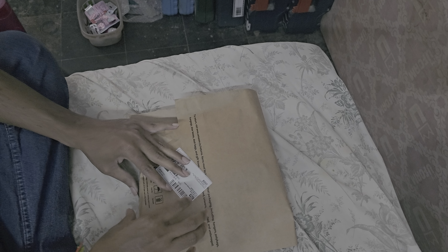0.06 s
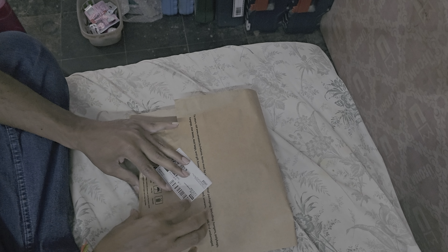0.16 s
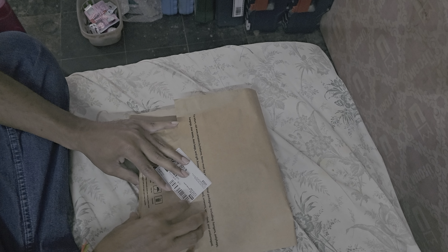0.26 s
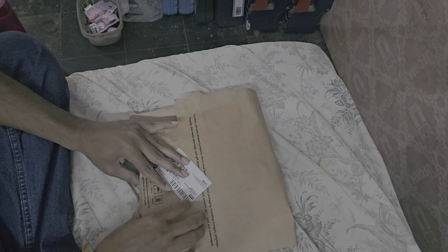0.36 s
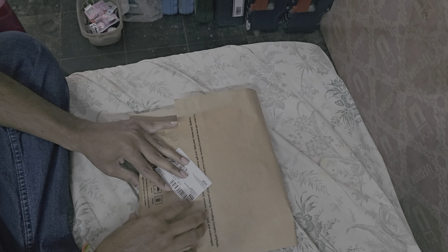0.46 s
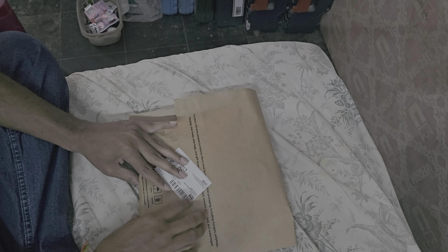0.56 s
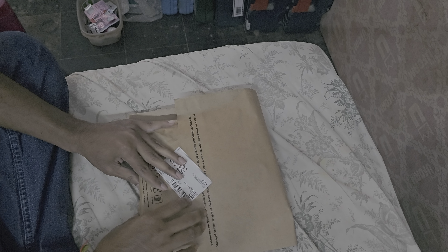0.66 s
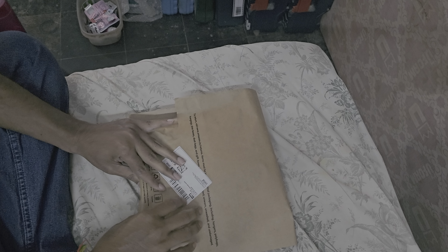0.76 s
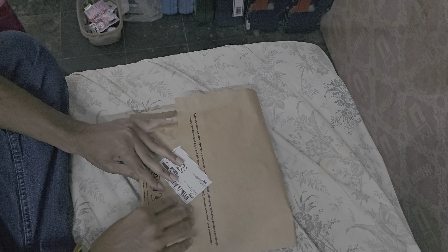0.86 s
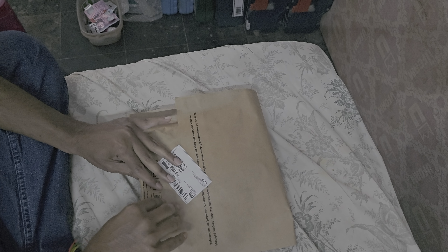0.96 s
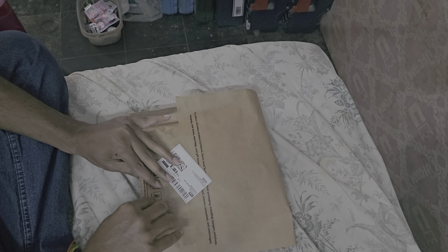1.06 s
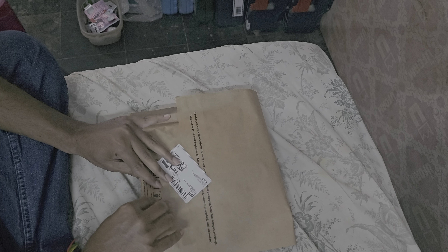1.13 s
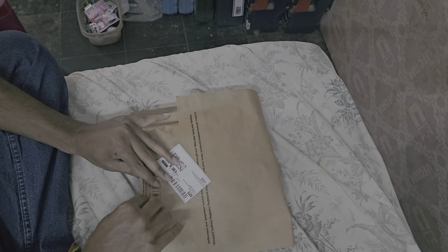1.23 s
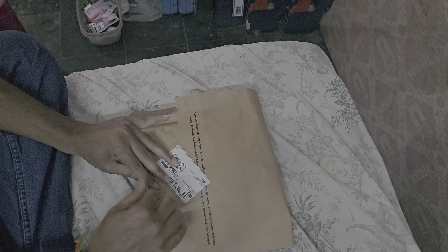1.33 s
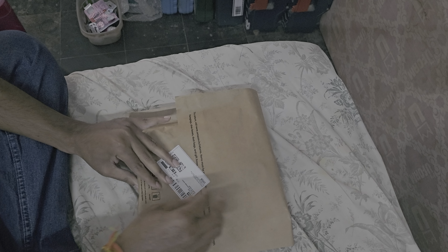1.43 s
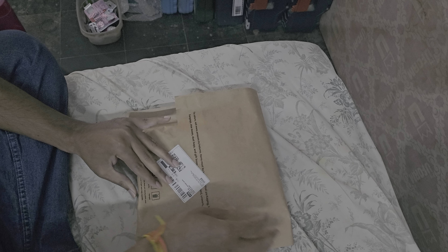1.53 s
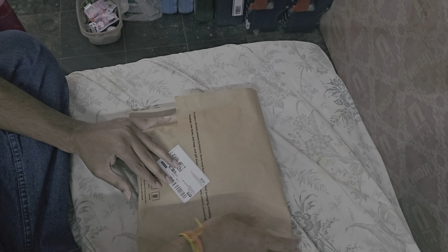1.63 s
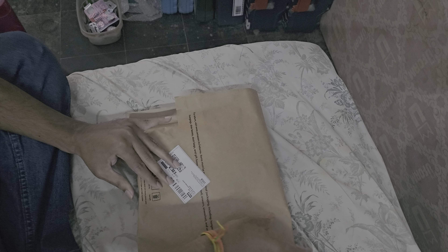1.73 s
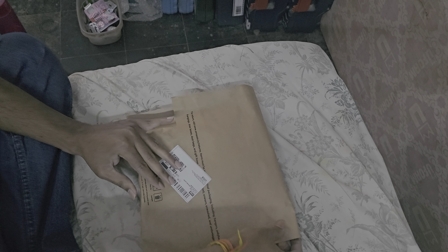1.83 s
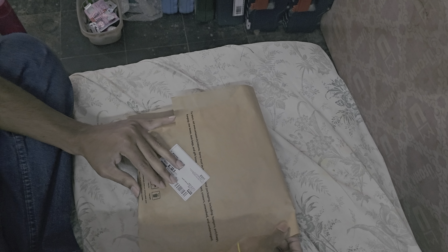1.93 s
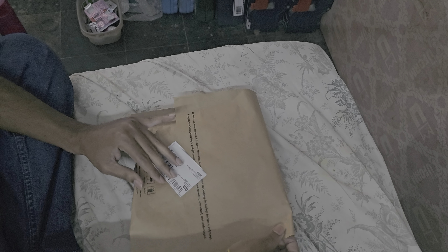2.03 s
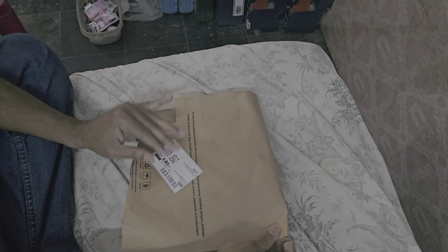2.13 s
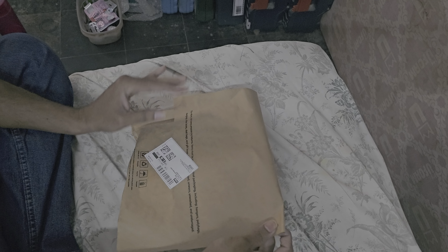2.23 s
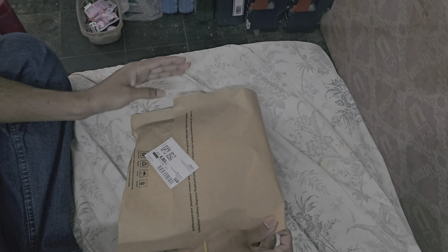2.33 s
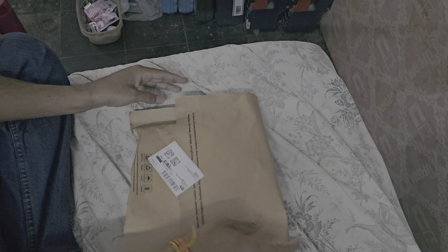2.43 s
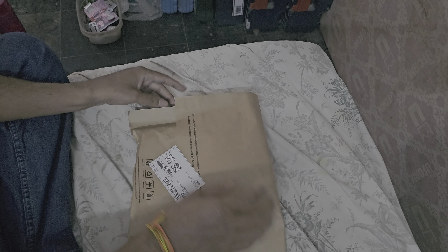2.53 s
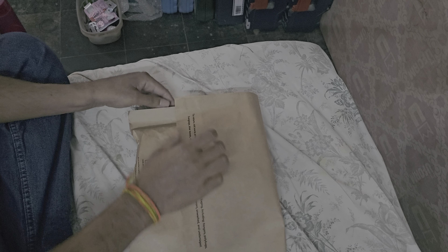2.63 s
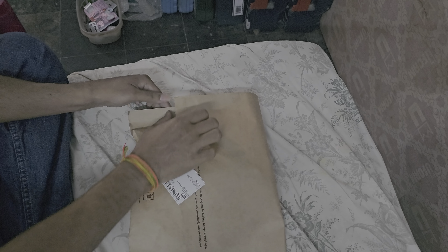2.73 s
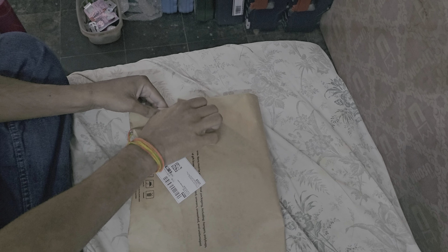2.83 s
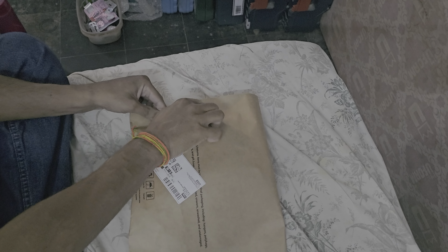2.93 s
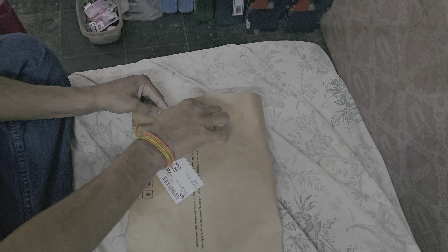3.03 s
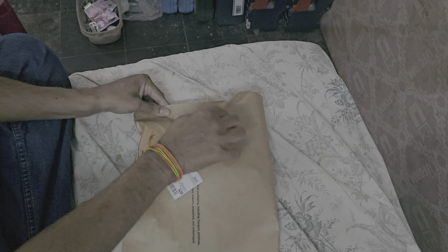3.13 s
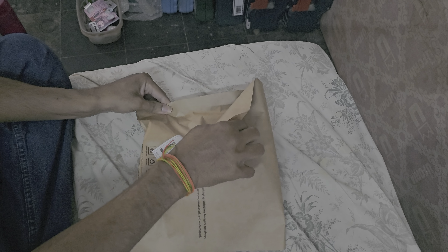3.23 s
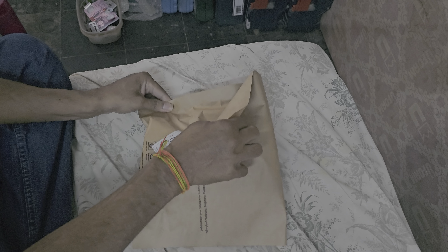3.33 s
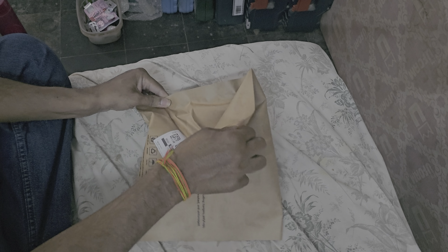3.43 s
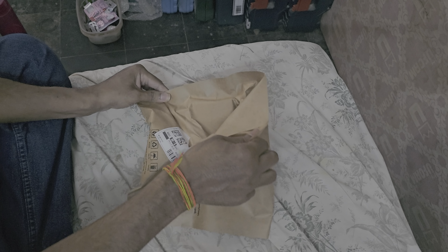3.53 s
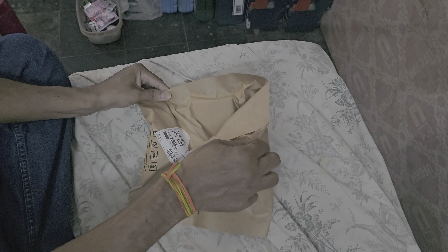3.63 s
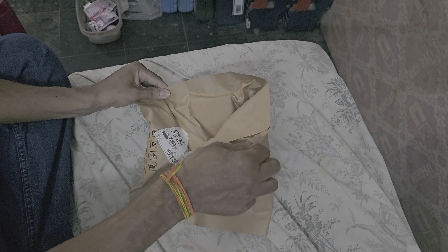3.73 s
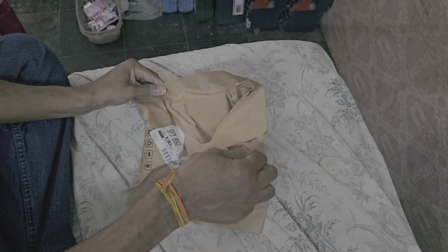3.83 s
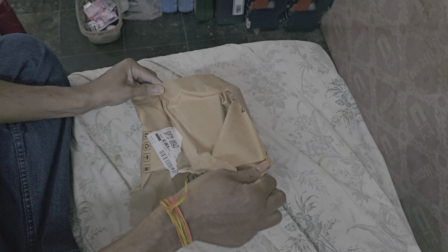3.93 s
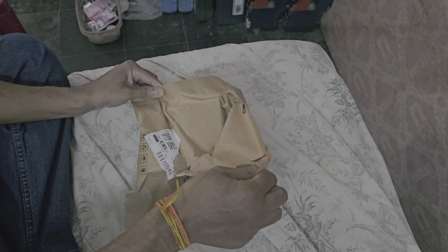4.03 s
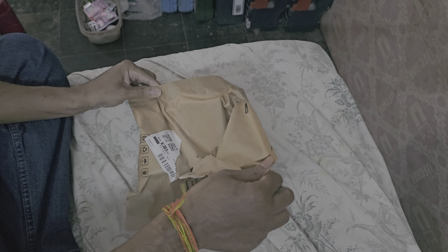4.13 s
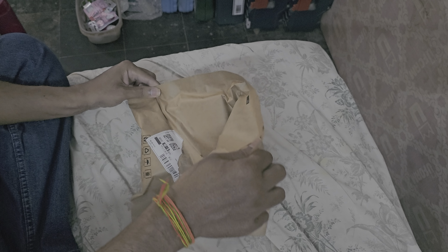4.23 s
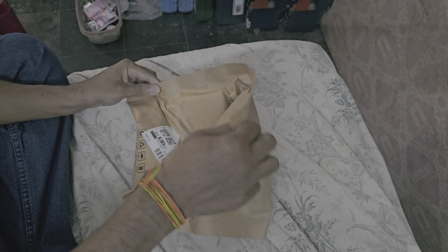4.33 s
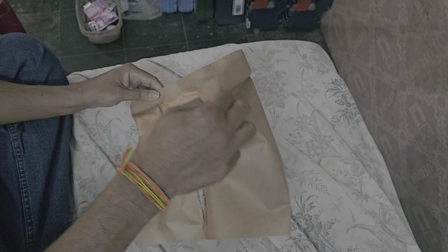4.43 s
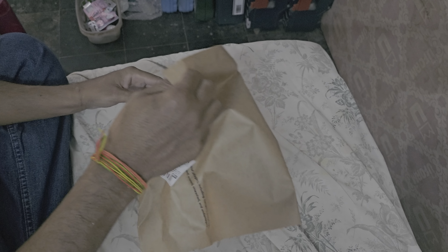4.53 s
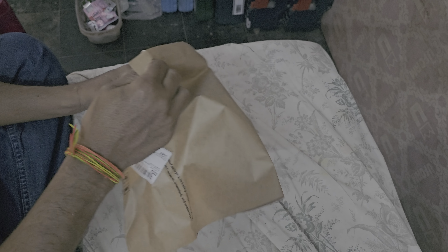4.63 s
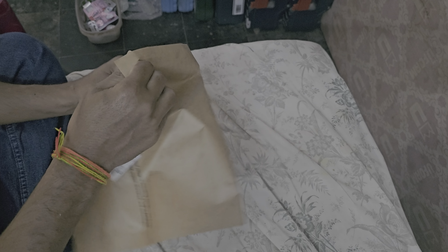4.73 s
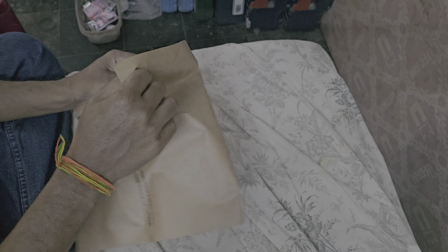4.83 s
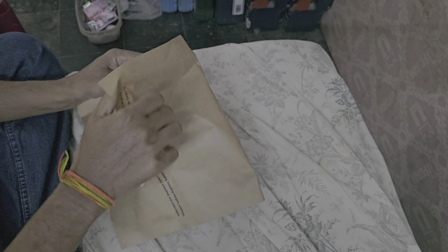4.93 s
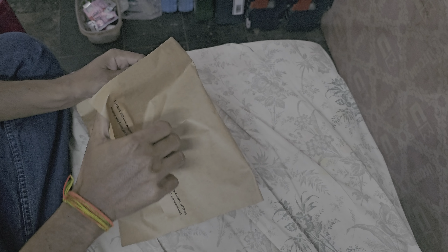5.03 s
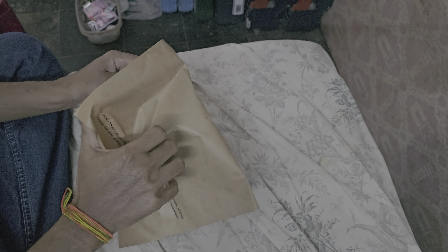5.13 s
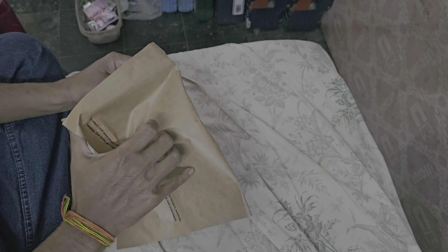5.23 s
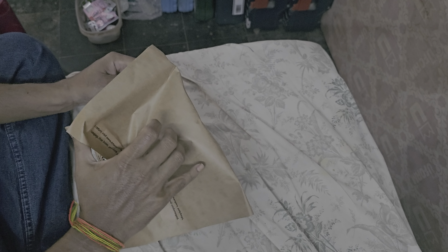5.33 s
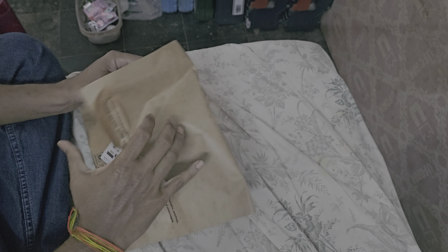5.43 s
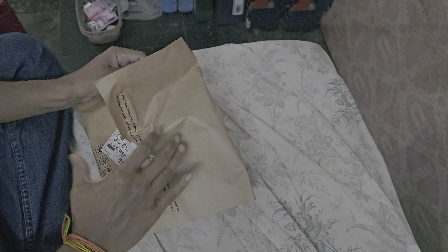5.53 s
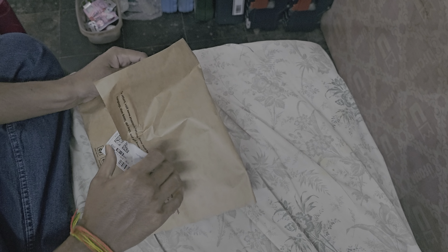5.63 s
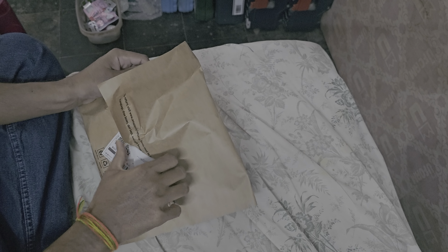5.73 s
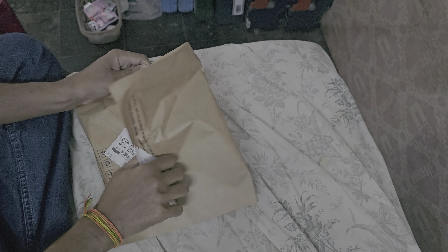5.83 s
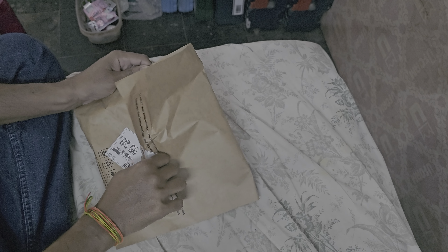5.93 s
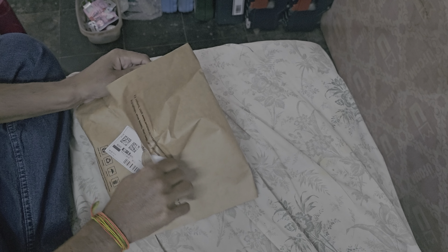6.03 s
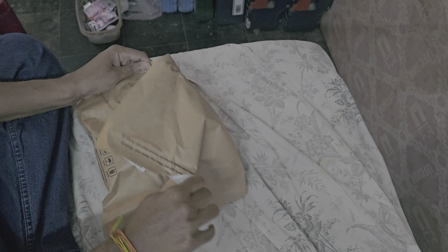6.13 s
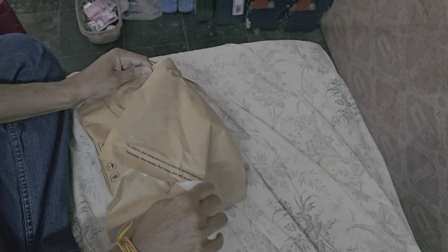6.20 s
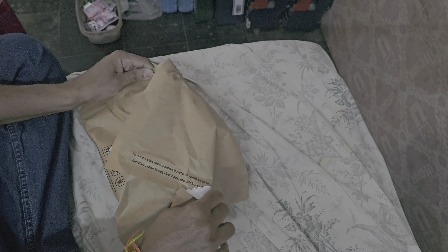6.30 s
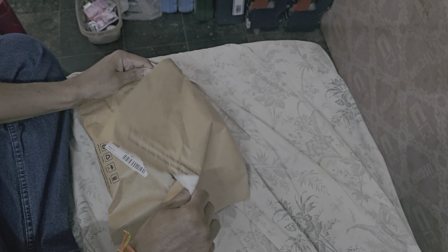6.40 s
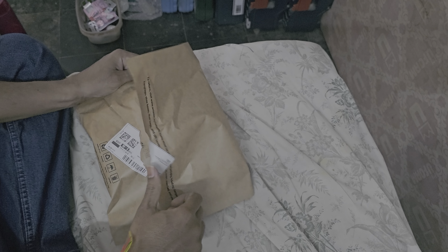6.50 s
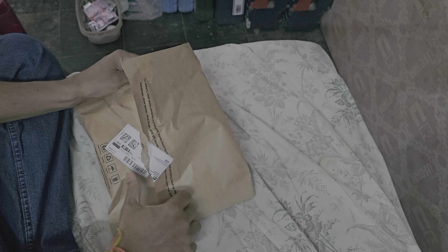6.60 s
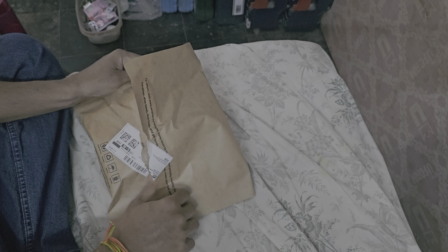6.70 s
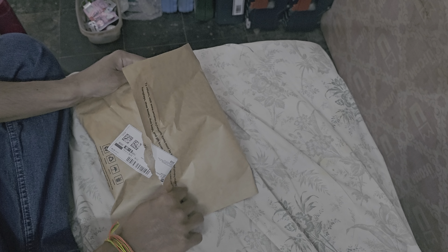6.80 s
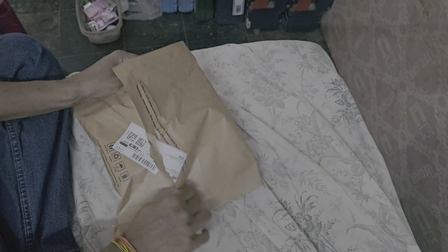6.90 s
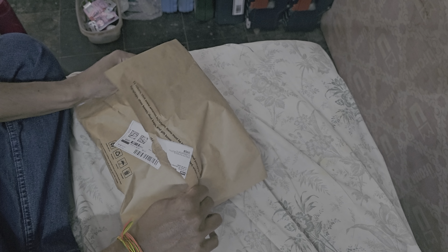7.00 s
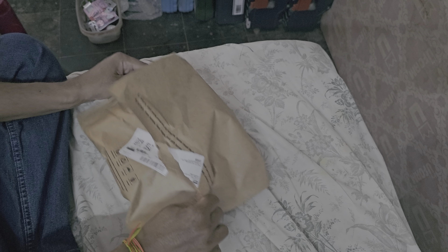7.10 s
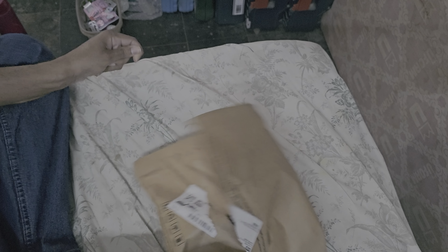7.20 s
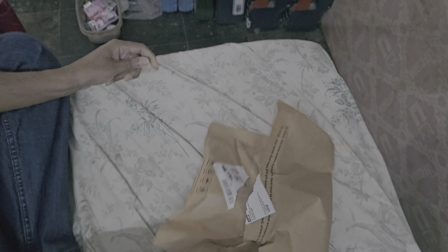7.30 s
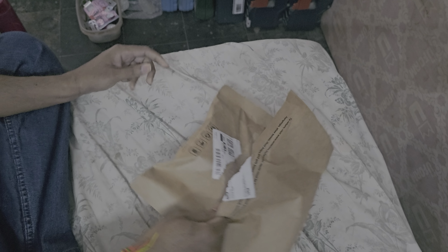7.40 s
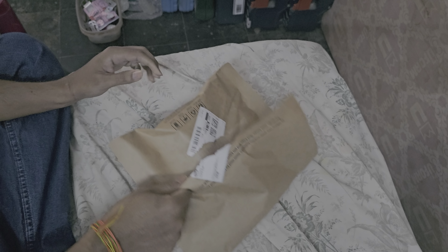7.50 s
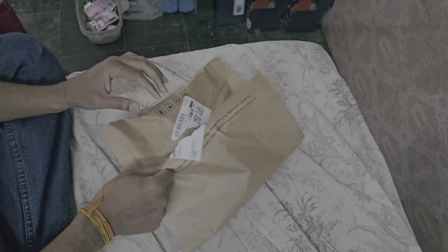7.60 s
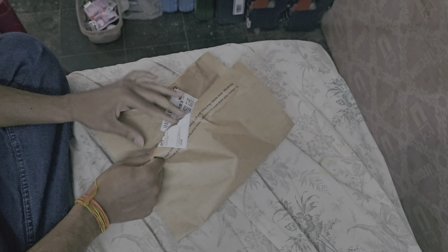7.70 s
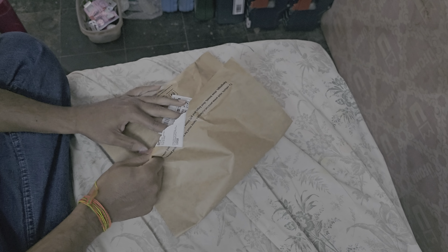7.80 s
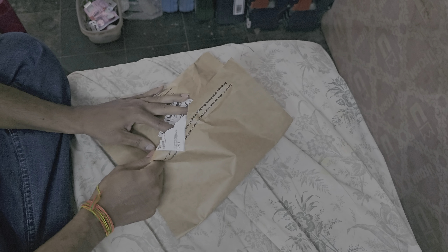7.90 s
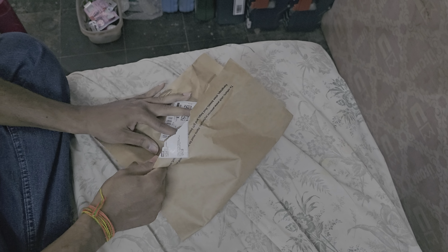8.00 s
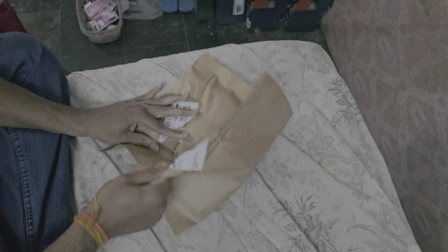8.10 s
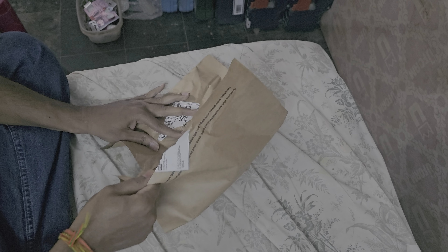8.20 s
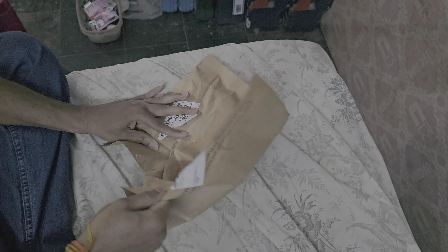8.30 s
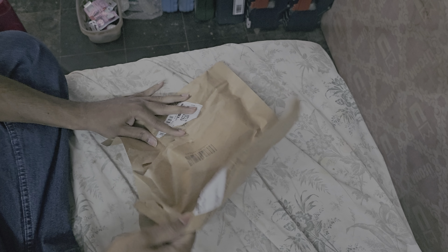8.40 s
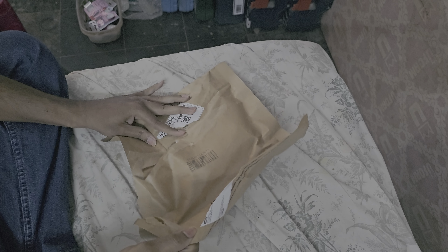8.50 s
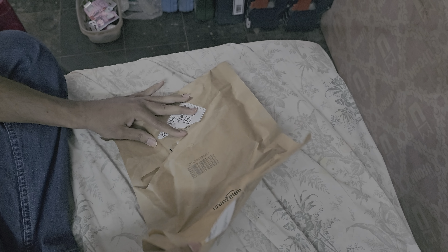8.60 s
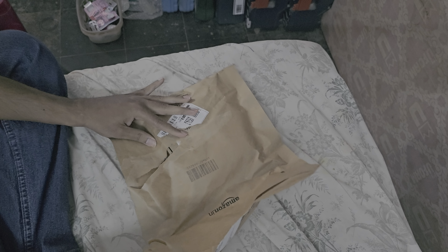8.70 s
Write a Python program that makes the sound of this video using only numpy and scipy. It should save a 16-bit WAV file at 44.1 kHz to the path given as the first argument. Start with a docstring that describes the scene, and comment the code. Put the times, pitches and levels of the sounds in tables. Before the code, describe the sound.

Hands rub, crease and tear a stiff paper envelope, faint at first, then loud irregular snaps and crackles over a low room hum.

```python
"""Small room, bed, phone with two microphone ports close above a stiff paper envelope; low hum throughout.
Faint creases and rubs come first, with a firmer snap near 1 s; from 2.7 s the hands pull harder.
The loudest snap falls at 3.1 s, tearing follows to 4 s, then lighter pulls, and heavy ones again from 5.2 s to 8.5 s.
Creases are short filtered cracks with a thud; crackle, hiss and flapping are paper noise gated by random
buckles and raised by strokes of the hands. The room answers with a short tail of decaying noise."""
import sys
import numpy as np
from scipy import signal
from scipy.fft import rfft, irfft
from scipy.io import wavfile
from scipy.ndimage import uniform_filter1d

SR = 44100
rng = np.random.default_rng(int(sys.argv[2]) if len(sys.argv) > 2 else 0)


def master(y):
    """Save y as 16-bit WAV."""
    cut = np.clip(np.atleast_2d(y).T, -1, 1)
    pcm = np.round(cut * 32767)  # scale
    wavfile.write(sys.argv[1], SR, pcm.astype(np.int16))


N = 385875  # 8.75 s

# building and street rumble, relative spectrum: (frequency [Hz], density [dB per Hz])
HUM_SPECTRUM = [(12, -34), (20, -10), (81, 2.5), (142, -7.5), (377, -12), (434, -15.5), (574, -14.5),
                (1480, -29), (1710, -31), (3340, -34.5), (5080, -48), (7310, -47.5), (8180, -54),
                (16000, -72)]
# the two microphone ports: (frequency [Hz], side against mid [dB])
PORT_DIFFERENCE = [(30, -16), (100, -21.5), (300, -12.5), (1000, -5.5), (3000, 0)]
# reverberation of the small room: (frequency [Hz], time to fall 60 dB [s])
ROOM_DECAY = [(300, 0.32), (8000, 0.32)]
# relative spectrum of the paper noise: (frequency [Hz], density [dB per Hz])
PAPER_SPECTRUM = [(59, -31), (100, -10.5), (262, -2.5), (317, -6.5), (1240, -2), (2210, -2.5), (4290, 2),
                  (8510, -9.5), (15100, -13.5), (16500, -11)]
# pulls, tears and rubs of the hands: (start [s], swell [s], hold [s], crackle [dB],
# fibre hiss against crackle [dB], flapping sheet against crackle [dB])
HAND_STROKES = [(0.45, 0.041, 0.035, -57.5, -5, -6), (0.69, 0.065, 0.023, -52, -14, 0),
                (0.84, 0.07, 0.055, -47, -9, 0.5), (1.0, 0.01, 0.14, -53, -5.5, -1),
                (1.2, 0.048, 0.03, -47, -6, -7), (1.29, 0.019, 0.026, -47, -4, 0.5),
                (1.81, 0.028, 0.075, -53.5, -2, -1), (1.98, 0.017, 0.017, -42, -6, -10),
                (2.19, 0.015, 0.12, -55, -0.5, 3.5), (2.41, 0.031, 0.11, -55, -0.5, -0.5),
                (2.721, 0.028, 0.012, -38, -13, -3), (2.79, 0.11, 0.062, -38.5, -12, -7),
                (2.98, 0.01, 0.14, -47, -10, -10), (3.103, 0.0057, 0.25, -28, -1, -7.5),
                (3.459, 0.011, 0.13, -24.5, -2.5, -5.5), (3.62, 0.021, 0.043, -32, 0, -3.5),
                (3.819, 0.044, 0.089, -30.5, -1.5, -10), (3.947, 0.0046, 0.088, -24.5, 2, -10.5),
                (4.239, 0.016, 0.056, -40, -17, -9), (4.38, 0.032, 0.032, -37.5, -11, -4.5),
                (4.48, 0.0088, 0.06, -38, -16, -4), (4.717, 0.01, 0.078, -30, -16, -9.5),
                (4.91, 0.027, 0.12, -32.5, -9, -9), (5.0, 0.01, 0.13, -38.5, -11.5, -7),
                (5.201, 0.05, 0.018, -36, -2, -0.5), (5.487, 0.0026, 0.036, -29, -7.5, 1),
                (5.56, 0.033, 0.015, -48, -12, 6.5), (5.833, 0.013, 0.014, -34, -10.5, 1),
                (5.87, 0.051, 0.067, -30.5, -11.5, -9.5), (6.0, 0.01, 0.075, -33.5, -32, -10),
                (6.065, 0.012, 0.06, -26.5, -3, -9), (6.07, 0.087, 0.066, -20, -4, -7.5),
                (6.251, 0.013, 0.03, -27, -5, -11.5), (6.438, 0.035, 0.073, -32.5, -11.5, -3.5),
                (6.56, 0.011, 0.028, -29, -22, -7), (6.72, 0.098, 0.07, -44, -2, -6),
                (6.922, 0.074, 0.028, -27, -3.5, -4), (7.059, 0.032, 0.075, -31.5, -2.5, -12),
                (7.185, 0.011, 0.12, -26, -10.5, -7), (7.28, 0.024, 0.056, -24.5, -6, -3),
                (7.4, 0.005, 0.13, -44, 1, -14), (7.53, 0.011, 0.037, -45, -2, -7.5),
                (7.64, 0.0069, 0.062, -44, -8, 0), (7.72, 0.0055, 0.063, -37, -10.5, -3.5),
                (7.818, 0.0035, 0.012, -27.5, -5.5, -3), (7.869, 0.043, 0.048, -30.5, -5.5, -4),
                (8.0, 0.011, 0.1, -38, -4.5, -4), (8.099, 0.006, 0.1, -22.5, -1, -7),
                (8.345, 0.051, 0.053, -23, 1, -7.5), (8.599, 0.052, 0.019, -40, -12, -3.5),
                (8.69, 0.0069, 0.068, -43, -9, -10)]
# creases that snap: (time [s], peak [dB], ring [Hz], treble rms over SNAP_S against the peak [dB])
CREASE_SNAPS = [(0.222, -45, 600, -32), (0.335, -48, 826, -31), (0.452, -48, 2470, -25),
                (0.765, -40, 3000, -24), (0.785, -21, 2720, -20), (0.79, -20, 1280, -28),
                (0.917, -40, 3000, -26), (0.934, -33, 700, -25), (0.97, -12.5, 1020, -19.5),
                (1.163, -42, 2490, -27), (1.204, -31.5, 2600, -32), (1.317, -29, 1210, -21),
                (1.495, -24.5, 2480, -25), (1.884, -37.5, 624, -15), (1.992, -31, 2180, -14),
                (2.008, -35, 3500, -10), (2.277, -36, 1500, -25), (2.423, -37, 2500, -24),
                (2.564, -29.5, 1520, -9), (2.759, -21.5, 1840, -16.5), (2.85, -24, 2770, -16.5),
                (2.919, -19.5, 1430, -14), (2.935, -15, 1320, -21.5), (3.054, -31.5, 760, -14),
                (3.108, -3.5, 1520, -16.5), (3.14, -15, 1830, -21), (3.32, -9, 3180, -20),
                (3.408, -12.5, 624, -24.5), (3.468, -12.5, 1350, -15), (3.511, -10, 1190, -15),
                (3.568, -12.5, 890, -17), (3.664, -10, 1930, -14), (3.8, -25.5, 1390, -17),
                (3.953, -12, 1440, -6), (3.969, -9, 4180, -4.5), (3.99, -8.5, 1500, -16),
                (4.265, -23.5, 1082, -15), (4.324, -20, 840, -15), (4.48, -28, 1700, -30),
                (4.522, -18.5, 1400, -13.5), (4.607, -16.5, 2950, -9), (4.722, -16.5, 880, -23),
                (4.739, -24, 1500, -15.5), (4.792, -19, 3530, -13), (4.813, -22, 800, -25),
                (4.827, -8.5, 1280, -15), (4.921, -19, 4200, -36), (4.934, -19, 826, -25),
                (4.958, -17, 3000, -23), (4.982, -17.5, 1390, -13.5), (5.086, -22, 4270, -8),
                (5.113, -21, 1450, -17), (5.211, -21.5, 1170, -23), (5.243, -10.5, 3650, -13.5),
                (5.276, -19.5, 1110, -13), (5.356, -13.5, 1390, -11), (5.451, -20.5, 1400, -11),
                (5.491, -10, 1090, -19.5), (5.592, -23, 1090, -17), (5.609, -12.5, 1270, -12.5),
                (5.706, -35, 2700, -17), (5.84, -24.5, 950, -28), (5.933, -14.5, 1410, -15.5),
                (5.964, -15, 597, -20), (6.025, -19.5, 2000, -35), (6.069, -15.5, 1340, -19),
                (6.263, -9.5, 1540, -40), (6.338, -12, 980, -15), (6.47, -23.5, 1430, -15),
                (6.523, -11.5, 1520, -14), (6.579, -20, 870, -18.5), (6.729, -25, 1990, -18.5),
                (6.777, -18.5, 1500, -14), (6.826, -34, 1110, -13), (6.84, -12.5, 3260, -15),
                (6.935, -40, 1210, -10), (6.967, -13, 4260, -19), (7.001, -12, 1180, -11),
                (7.063, -22.5, 990, -17), (7.123, -14.5, 3320, -37), (7.193, -9.5, 613, -18),
                (7.237, -13, 810, -11), (7.309, -14.5, 633, -24), (7.351, -15.5, 1320, -8.5),
                (7.446, -22, 627, -12), (7.476, -23.5, 2210, -11.5), (7.569, -23.5, 1330, -43),
                (7.643, -22, 1070, -17), (7.731, -17, 2330, -17.5), (7.827, -14.5, 670, -14),
                (7.93, -17.5, 673, -6), (8.014, -20.5, 1570, -31), (8.104, -14, 4250, -27),
                (8.111, -6.5, 1310, -23), (8.137, -12, 1330, -18), (8.16, -9.5, 3700, -16),
                (8.204, -13, 3700, -15), (8.362, -35, 3840, -3), (8.399, -7, 3580, -9),
                (8.441, -6, 4070, -33), (8.534, -20.5, 1450, -25), (8.62, -33.5, 660, -3.5),
                (8.697, -16.5, 4260, -15)]

HUM_DB = -47.5  # rms ahead of the final rounding
ROOM_DB = -8.5  # energy of the tail against the direct sound
CRACKLES_PER_S, CRACKLE_SPREAD_DB, CRACKLE_S = 600., 4, 0.00055
# a stroke swells through SWELL_DB, holds, then settles to near silence
SWELL_DB, SETTLE_DB_PER_S, STILL_DB = 16, 308, -91
# crackle shed by a snap, against its peak; hiss and flapping against that crackle
AFTER_SNAP_DB, AFTER_HISS_DB, AFTER_FLAP_DB, AFTER_DB_PER_S = -27, -6, -14, 358
SNAP_S = 0.0091  # span over which treble and thud of a snap are levelled
# thud rms against the peak, for a crease ringing at 1 kHz; long, low creases thud more
THUD_DB, THUD_DB_PER_OCTAVE = -21.5, -6.5
TOP_HZ = 15900  # upper limit of the sound


def undb(db):
    """Amplitude ratio of a level in dB."""
    return 10 ** (np.asarray(db) / 20)


def level(x, db):
    """Bring a signal to an rms level in dB."""
    return x * undb(db) / np.sqrt(np.mean(x ** 2))


def along(table, hz):
    """Value of a (frequency [Hz], value) table on a log frequency axis."""
    table_hz, values = np.transpose(table)
    return np.interp(np.log(np.maximum(hz, 1)), np.log(table_hz), values)


def colour(x, table):
    """Shape a spectrum by (frequency [Hz], level [dB]) points."""
    n = x.shape[-1]
    hz = np.arange(n // 2 + 1) * SR / n
    return irfft(rfft(x) * undb(along(table, hz)), n)


def band(x, lo_hz, hi_hz):
    """Keep the sound between two frequencies."""
    edges_hz = [lo_hz, min(hi_hz, .45 * SR)]
    return signal.sosfilt(signal.butter(2, edges_hz, "bandpass", fs=SR, output="sos"), x)


def at_ports(mid, side):
    """Left and right port: the side part is weakest in the bass and grows toward the treble."""
    side = colour(side, PORT_DIFFERENCE)
    return np.array([mid + side, mid - side])


def ports(n):
    """Noise at the two ports: alike in the bass, unrelated in the treble."""
    mid, side = rng.standard_normal((2, n))
    return at_ports(mid, side)


def walk(rate):
    """Random levels held 1 / rate s, then smoothed twice over that time; spread near 1."""
    k = int(SR / rate)
    steps = np.repeat(rng.standard_normal(N // k + 1), k)
    return 1.27 * uniform_filter1d(uniform_filter1d(steps, k), k)[:N]


def fade(x, seconds):
    """Sudden start, exponential fall."""
    return signal.lfilter([1], [1, -np.exp(-1 / (seconds * SR))], x)


def hum():
    """A low rumble from the building and street: coloured noise, wavering a little."""
    waver_db = 0.13 * walk(3.54)
    return level(colour(ports(N), HUM_SPECTRUM) * undb(waver_db), HUM_DB)


def room(x):
    """Walls and furniture return a dense tail a few milliseconds late."""
    t = np.arange(int(.4 * SR)) / SR
    tail = 0
    for hz in 125 * 2. ** np.arange(8):
        octave = band(rng.standard_normal((2, len(t))), hz / 2 ** .5, hz * 2 ** .5)
        tail = tail + octave * undb(-60 * t / along(ROOM_DECAY, hz))
    tail *= np.clip((t - .003) / 0.003, 0, 1)
    tail *= undb(ROOM_DB) / np.sqrt(np.sum(tail ** 2) / 2)
    # the ports share the low part of the tail
    mid, side = signal.fftconvolve(x.mean(axis=0)[None], tail, axes=1)[:, :N]
    return at_ports(mid, side)


def effort():
    """Levels in dB of crackle, hiss and flapping: strokes swell, hold, settle; snaps shed a short crackle."""
    step = .001  # s
    t = np.arange(0, N / SR + step, step)
    power = np.full((3, len(t)), undb(2 * STILL_DB))  # undb of twice the dB gives power
    for start, swell, hold, crackle_db, hiss_db, flap_db in HAND_STROKES:
        full = start + swell
        rising_db = SWELL_DB * (t - full) / max(swell, step)
        settling_db = -SETTLE_DB_PER_S * np.maximum(t - full - hold, 0)
        stroke_db = np.where(t < full, rising_db, settling_db) + crackle_db
        power += undb(2 * (stroke_db + np.array([[0], [hiss_db], [flap_db]])))
    for s, peak_db, *_ in CREASE_SNAPS:
        shed_db = peak_db + AFTER_SNAP_DB - AFTER_DB_PER_S * np.abs(t - s)
        parts_db = shed_db + np.array([[0], [AFTER_HISS_DB], [AFTER_FLAP_DB]])
        power += (t >= s) * undb(2 * parts_db)
    return [np.interp(np.arange(N) / SR, t, 10 * np.log10(p)) for p in power]


def handling():
    """Many small buckles, rarely a big one, gate the paper noise, with different strengths in each band."""
    crackle_db, hiss_db, flap_db = effort()
    sizes_db = CRACKLE_SPREAD_DB * np.minimum(rng.exponential(size=N), 4)
    buckles = (rng.random(N) < CRACKLES_PER_S / SR) * undb(sizes_db)
    paper, out = colour(ports(N), PAPER_SPECTRUM), 0
    # the upper middle follows both the crackle and the hiss
    bright_db = 0.63 * crackle_db + 0.37 * hiss_db
    # (low [Hz], high [Hz], level curve [dB], buckle length [CRACKLE_S], steady rubbing under it [gain])
    bands = [(89, 760, flap_db, 13.4, 0.48),
             (672, 1515, crackle_db - 4.5, 1.38, 0.21),
             (2330, 4600, bright_db, 2.5, 1.9),
             (5360, 19845, hiss_db, 0.33, 1.3)]
    for lo_hz, hi_hz, db, longer, rub in bands:
        gate = fade(buckles * undb(3 * rng.standard_normal(N)), CRACKLE_S * longer)
        flicker = undb(2.7 * walk(45))
        gated = (rub + gate) * flicker * band(paper, lo_hz, hi_hz)
        out = out + level(gated, 0) * undb(db)
    return out


def snaps():
    """A crease flips in a millisecond or two: a broad crack leaning to its own pitch, and a thud of the sheet."""
    n = 2048
    out = np.zeros((2, N + n))
    t = np.arange(n) / SR
    size = int(SNAP_S * SR)
    for s, peak_db, hz, treble_db in CREASE_SNAPS:
        thud_db = THUD_DB + THUD_DB_PER_OCTAVE * (np.log2(hz) - np.log2(1000))
        envelope = np.minimum(t / 0.00055, 1) * (np.exp(-t / 0.0019) + 0.28 * np.exp(-t / 0.0083))
        shudder = ports(n) * envelope
        # one clean kick as the shudder reaches full strength, two samples earlier at the left port
        shudder[[0, 1], [24, 26]] -= 6.5
        shudder = colour(shudder, PAPER_SPECTRUM)
        broad = band(shudder, 480, 3020) + 1.14 * band(shudder, hz / 1.276, hz * 1.203)
        treble = band(shudder, 5500, 18000)
        thud = band(ports(n) * np.exp(-t / 0.013), 110, 785)
        i = int(s * SR)
        out[:, i:i + n] += broad * undb(peak_db) / np.abs(broad.mean(axis=0)).max()
        for part, db in [(treble, treble_db), (thud, thud_db)]:
            rms = np.sqrt(np.mean(part[:, :size] ** 2))
            out[:, i:i + n] += part * undb(peak_db + db) / rms
    return out[:, :N]


def scene():
    """The envelope and its room, slightly stronger at the right port, over the hum."""
    paper = handling() + snaps()
    balance = undb([[-.4], [.4]])  # left, right
    return (paper + room(paper)) * balance + hum()


def record(dry):
    """Round the loudest peaks and keep the sound below TOP_HZ."""
    rounded = np.tanh(1.447 * dry) / 1.087
    return signal.sosfilt(signal.ellip(10, .2, 60, TOP_HZ, fs=SR, output="sos"), rounded)


dry = scene()
out = record(dry)
master(out)
```